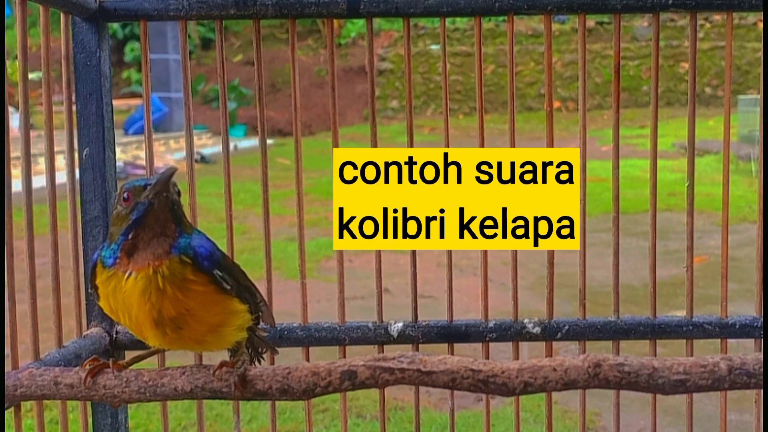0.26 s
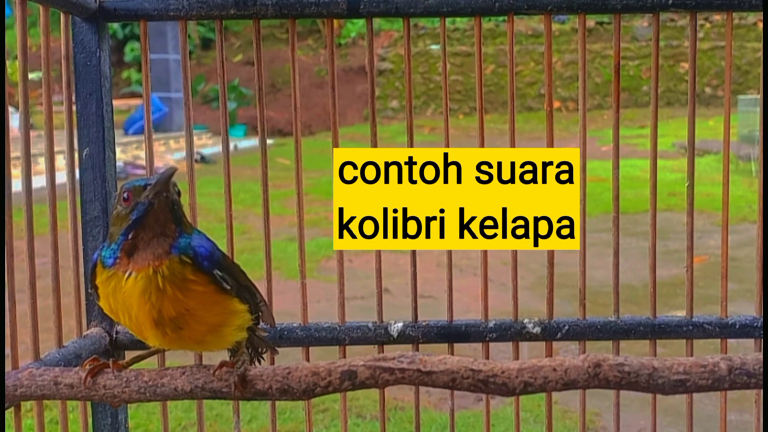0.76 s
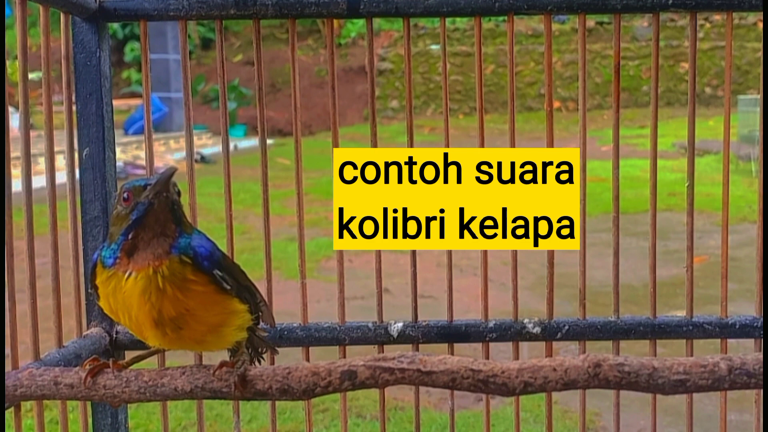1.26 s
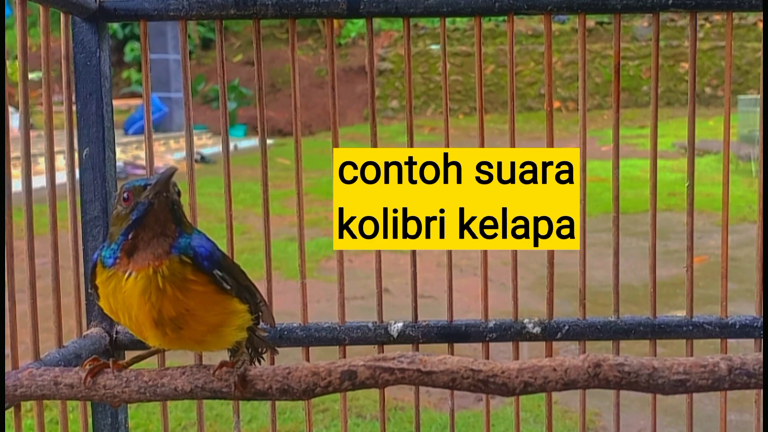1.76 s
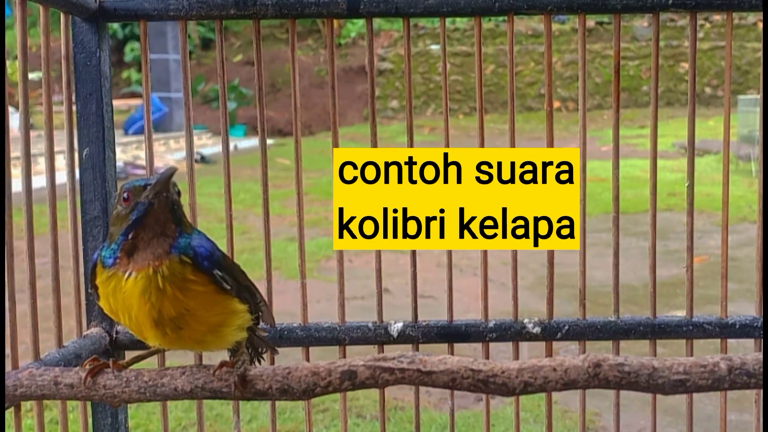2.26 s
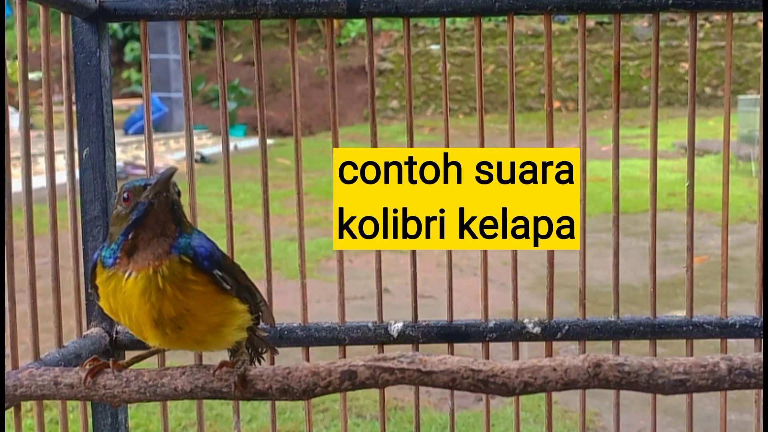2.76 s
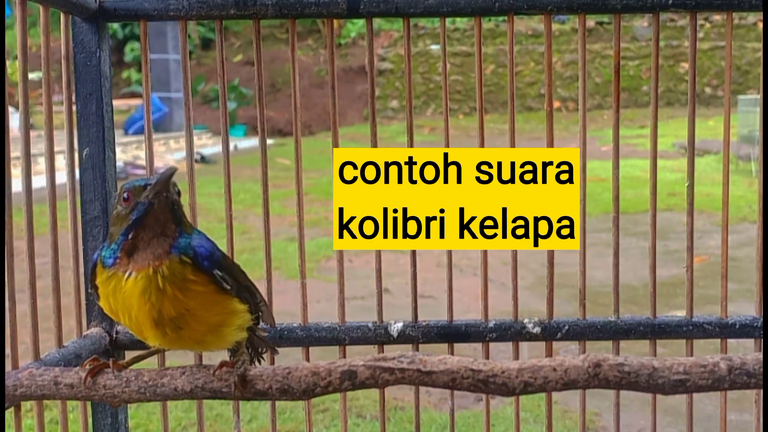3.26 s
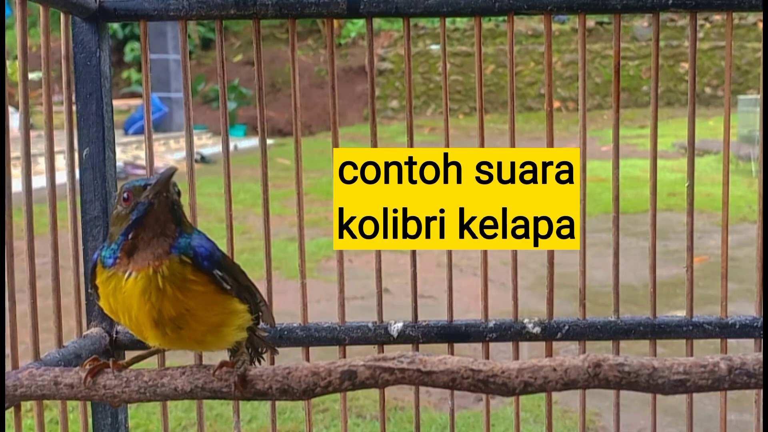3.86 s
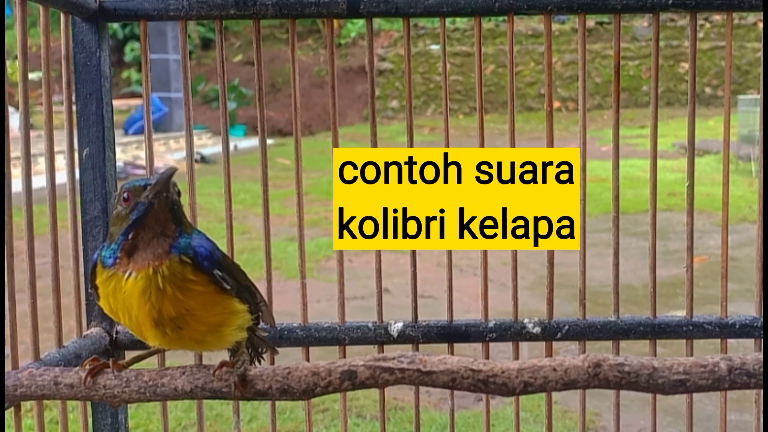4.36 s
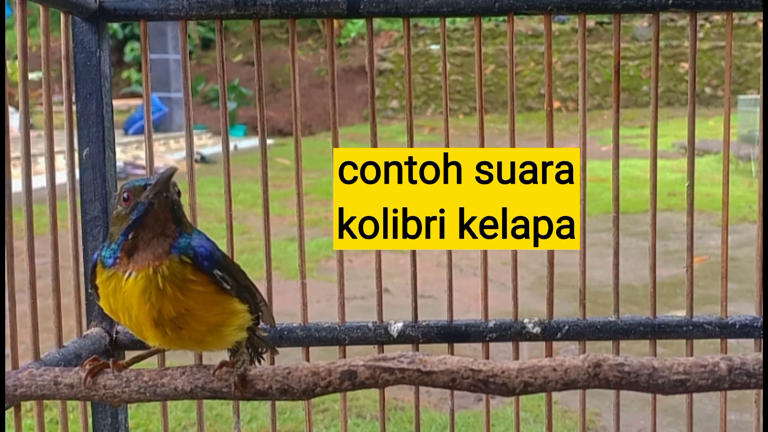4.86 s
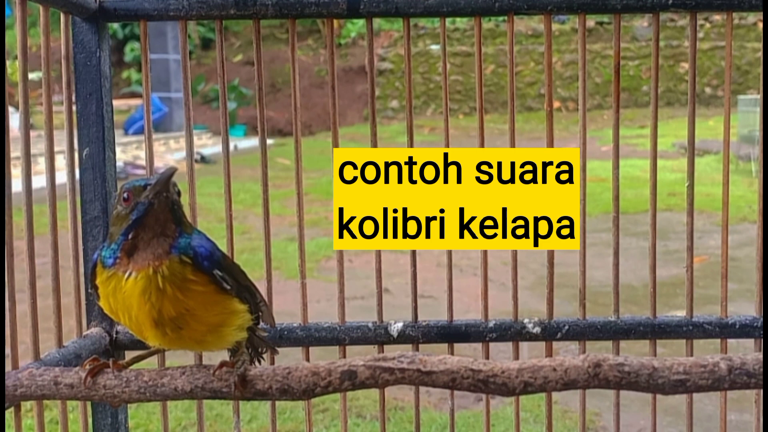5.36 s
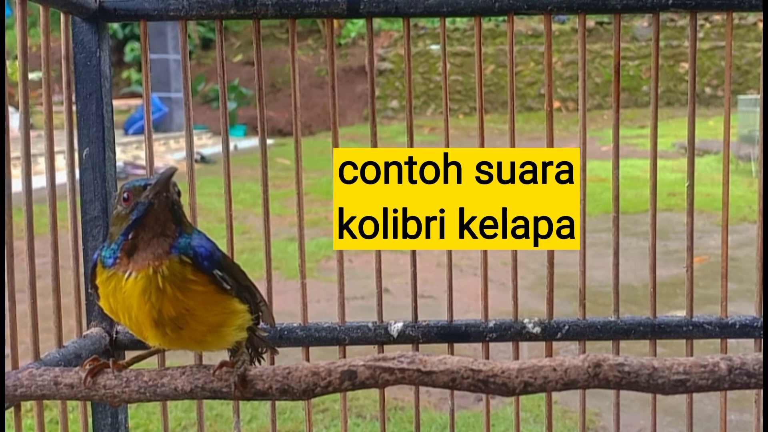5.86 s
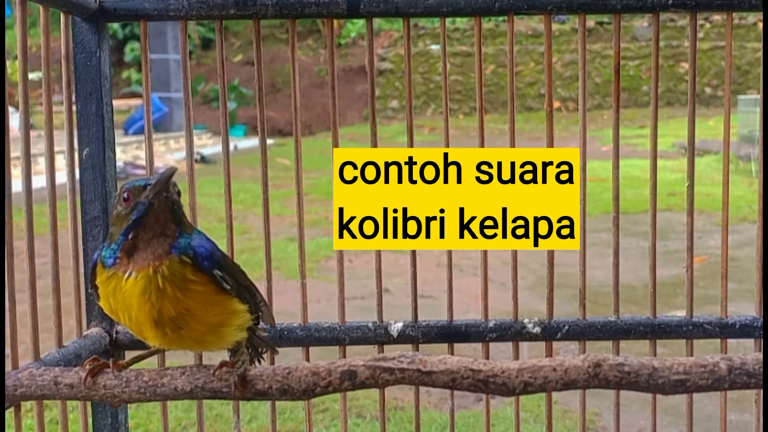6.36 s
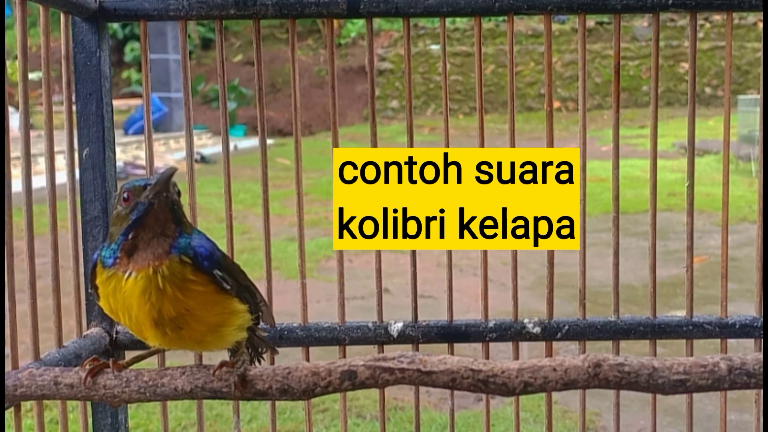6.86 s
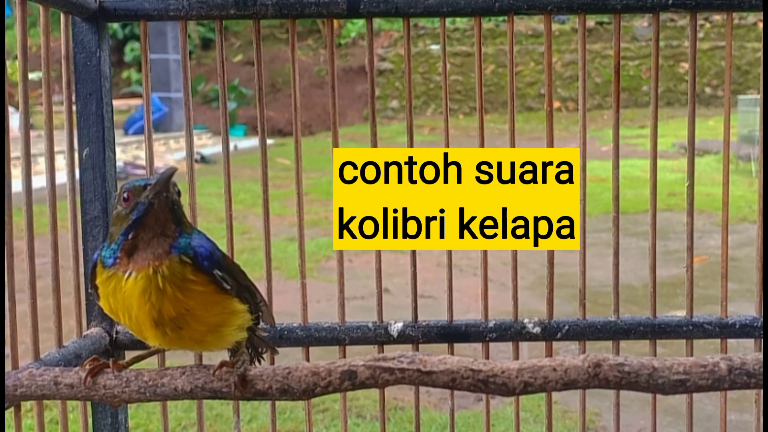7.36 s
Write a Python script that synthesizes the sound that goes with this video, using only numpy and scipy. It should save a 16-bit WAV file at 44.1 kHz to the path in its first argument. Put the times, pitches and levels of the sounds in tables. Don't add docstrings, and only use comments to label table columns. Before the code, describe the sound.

Close-up piercing birdsong: swooping notes, a rapid run of rising chips, buzzy whistles, then sparser chirps, above a constant soft outdoor rumble.

```python
import sys
import numpy as np
from scipy import signal
from scipy.fft import rfft, irfft, next_fast_len
from scipy.io import wavfile
from scipy.ndimage import uniform_filter1d, map_coordinates

SR = 44100
rng = np.random.default_rng(int(sys.argv[2]) if len(sys.argv) > 2 else 0)


def invert_db(level):
    return 10 ** (np.asarray(level, dtype=float) / 20)


def log_audio(samples):
    frames = np.atleast_2d(samples).T
    limited = np.clip(frames, -1, 1)
    pcm = np.round(limited * 32767).astype(np.int16)
    wavfile.write(sys.argv[1], SR, pcm)


N = 336483

# (start [s], air level [dB], climb to the top [s], upper voice level [dB], lower voice level [dB])
CHIPS = [(1.894, -18, 0.051, -22, -24), (2.039, -17.5, 0.054, -22, -22), (2.175, -16.5, 0.051, -22.5, -25),
         (2.303, -16, 0.046, -16.5, -26), (2.416, -17.5, 0.045, -6.5, -14),
         (2.542, -15.5, 0.043, -4.5, -24), (2.662, -16.5, .044, -3.5, -19), (2.786, -18.5, 0.043, -3, -19),
         (2.912, -16, 0.043, -3, -19), (3.067, -17, 0.042, -3.5, -25), (3.56, -16.5, 0.045, -2.5, -16),
         (3.791, -16.5, 0.044, -3.5, -11.5), (3.978, -16.5, 0.049, -3, -11.5),
         (4.193, -19.5, 0.049, -8, -8.5), (4.696, -18.5, 0.045, -8.5, -5), (4.886, -15, .048, -3, -14),
         (5.378, -16, 0.045, -11, -10), (5.564, -15.5, .05, -7, -19), (7.486, -15.5, 0.04, -14, -6.5)]


def in_time(rows):
    s, *columns = np.transpose(rows)
    return [np.interp(np.arange(N) / SR, s, c) for c in columns]


def rms_one(x):
    return x / np.sqrt(np.mean(x ** 2) + 1e-20)


def wobble(hz, size):
    r = np.exp(-2 * np.pi * hz / SR)
    return rms_one(signal.lfilter([1], [1, -2 * r, r * r], rng.standard_normal(size)))


def coloured(spectrum, likeness):
    size = next_fast_len(N)
    log_hz = np.log(np.maximum(np.fft.rfftfreq(size, 1 / SR), 1))
    spectrum_hz, spectrum_db = np.transpose(spectrum)
    likeness_hz, share = np.transpose(likeness)
    gain = invert_db(np.interp(log_hz, np.log(spectrum_hz), spectrum_db, -90, -90))
    alike = np.clip(np.interp(log_hz, np.log(likeness_hz), share), 0, 1)
    mid, side = rfft(rng.standard_normal((2, size)))
    both = np.sqrt(1 + alike) * mid + np.sqrt(1 - alike) * side * [[1], [-1]]
    return rms_one(irfft(gain * both, size)[:, :N])


def yard():
    # (time [s], level [dB])
    yard_level = [
        (0, -43),
        (.48, -40),
        (.52, -43),
        (3, -45),
        (6, -45),
        (7.63, -44.5),
    ]
    # (frequency [Hz], density [dB per Hz])
    yard_spectrum = [(25, -65), (66, -1.5), (92, 2.5), (796, -18.5), (1500, -22), (2480, -20), (3920, -23),
                     (16000, -26.5)]
    # (frequency [Hz], likeness [0 to 1])
    yard_likeness = [(30, 0.22), (90, 1), (300, 0.56), (640, 0.49), (1400, 0.018), (15000, .02)]
    noise = coloured(yard_spectrum, yard_likeness)
    rumble = signal.sosfilt(signal.butter(2, 600, fs=SR, output="sos"), noise)
    swell = invert_db(3 * wobble(5, N))
    return invert_db(in_time(yard_level)[0]) * (noise + (swell - 1) * rumble)


def engine():
    # (time [s], rate [firings per s], level [dB])
    firing = [
        (0, 24.46, -39),
        (.2, 24.63, -36.5),
        (.46, 24.2, -37),
        (.52, 24.77, -45),
        (.7, 25, -85),
    ]
    # (frequency [Hz], width [Hz], level [dB])
    pipe_modes = [(135, 18, 2), (279.5, 18, 2.5), (423.4, 10, -6.5), (562, 18, -13.5), (700, 22, -13),
                  (854, 18, -15)]
    rate, db = in_time(firing)
    turns = np.cumsum(rate) / SR
    fires = np.diff(np.floor(turns), prepend=0) > 0
    puffs = fires * invert_db(1.5 * rng.standard_normal(N))
    puffs = puffs + .03 * rng.standard_normal(N) * np.exp(-(turns % 1))
    out = 0
    for k, (hz, width, mode_db) in enumerate(pipe_modes):
        r = np.exp(-np.pi * width / SR)
        poles = [1, -2 * r * np.cos(2 * np.pi * hz / SR), r * r]
        out = out + (-1) ** k * invert_db(mode_db) * signal.lfilter([1, 0, -1], poles, puffs)
    return invert_db(db) * rms_one(out)


def add_glide(out, rows, lines, flutter, size=130):
    s, hz = np.transpose(rows)[:2]
    first, last = int(s[0] * SR) - 60, min(int(s[-1] * SR) + 60, N)
    t = np.arange(first, last) / SR

    def along(values):
        return uniform_filter1d(np.interp(t, s, values), size=size, mode="nearest")

    pitch_shake, level_shake = flutter[:, first:last]
    pitch = along(hz)
    phase = 2 * np.pi * np.cumsum(pitch * (1 + pitch_shake)) / SR + first
    edge = np.clip(np.minimum(t - t[0], t[-1] - t) / .003, 0, 1)
    for multiple, db in lines:
        swell = along(invert_db(db / 2)) ** 2 * (pitch * multiple < .36 * SR)
        out[first:last] += edge * swell * invert_db(level_shake) * np.sin(multiple * phase)


def squeak(out, s, length, db, draw, flutter):
    when, where, climb = draw
    at, hz = s + .6 * length * when, 3700 + 2200 * where
    rows = [(at, hz), (at + .006, hz + 300 + 500 * climb), (at + .013, hz + 800 + 1300 * climb)]
    squeak_db = db + 4 - np.array([8, 0, 10])
    add_glide(out, rows, [(1, squeak_db), (2, squeak_db - 11)], flutter)


def without_band(x, hz):
    return signal.sosfiltfilt(signal.butter(2, hz, "bandstop", fs=SR, output="sos"), x)


def rasp(voice):
    # (start [s], length [s], level [dB])
    note_air = [(0.608, 0.057, -19), (0.74, 0.047, -13.5), (.963, 0.045, -12.5), (1.181, 0.05, -13.5),
                (1.618, 0.049, -22.5), (1.766, 0.05, -20.5), (3.245, 0.091, -18.5), (3.405, 0.024, -28),
                (4.384, 0.061, -18), (5.056, 0.065, -14), (5.216, 0.032, -16.5), (5.837, 0.051, -24),
                (6.146, .044, -27), (6.633, 0.049, -19.5), (6.958, 0.057, -19), (7.138, 0.061, -18.5),
                (7.302, .054, -24)]
    # (start [s], length [s], level [dB])
    rustles = [
        (5.491, 0.071, -43),
        (5.772, 0.052, -41.5),
        (6.501, .077, -51),
        (6.855, 0.016, -32.5),
        (6.92, 0.023, -38),
    ]
    # (frequency [Hz], density [dB per Hz])
    mids_spectrum = [(900, -30.5), (2600, -17.5), (3600, -8), (4500, -1.5), (6000, 1), (7500, -7.5),
                     (9000, -10.5), (11000, -8.5)]
    treble_spectrum = [(7400, -19), (8700, -12), (10000, -8), (10700, 8.5), (11500, -5.5), (13500, -6),
                       (15200, -5), (16500, -7)]
    hoarse_from_s, hoarse_until_s = 1.85, 5.7
    gap_leak = .12
    t = np.arange(N) / SR
    mids, treble, squeaks = np.zeros(N), np.zeros(N), np.zeros(N)
    # (start, length, dB, time by which bright air outlasts the rest); chip air outlasts the climb
    bursts = [(s, climb + .007, db, .0058) for s, db, climb, *_ in CHIPS]
    bursts += [(*row, -.004) for row in note_air + rustles]
    chance = rng.random((len(bursts), 4, 3))
    shaky = np.array([.012 * wobble(500, N), 2 * wobble(400, N)])
    for (s, length, db, lingers), draws in zip(bursts, chance):
        near = slice(max(int((s - .03) * SR), 0), int((s + length + .12) * SR))
        rise = np.maximum(s + .0047 - t[near], 0)
        fall = np.maximum(t[near] - s - length + .018, 0)
        late = np.maximum(t[near] - s - length - lingers, 0)
        mids[near] += invert_db(db - 2280 * rise - 1150 * fall)
        thin_db = -7.5 - .41 * (db + 35.5)
        treble[near] += invert_db(db - 2000 * rise - 1600 * late) * invert_db(thin_db)
        if lingers > 0 and s < hoarse_until_s:
            for draw in draws:
                squeak(squeaks, s, length, db, draw, shaky)
    breath = invert_db(-30) * np.sqrt(uniform_filter1d(voice ** 2, size=400) + 1e-12)
    grain = invert_db(1.2 * wobble(500, N))
    partly = [(100, .82), (20000, .12)]   # (frequency [Hz], left-right likeness)
    hiss = (invert_db(.5) * mids + breath) * coloured(mids_spectrum, partly)
    hiss = hiss + (invert_db(9) * treble + breath) * coloured(treble_spectrum, partly)
    hiss = without_band(hiss, (10200, 11300))
    clear = gap_leak * hiss + (1 - gap_leak) * without_band(hiss, (2500, 4000))
    hiss = np.where((t > hoarse_from_s) & (t < hoarse_until_s), hiss, clear)
    fuzz = invert_db(-18) * voice * wobble(855, N)
    return grain * hiss + squeaks + fuzz


def arches(out, flutter, notes, rise, start, edge_db, drop, loss_db, octave_db):
    for s, hz, db, fall, end_hz in notes:
        rows = [(s - rise, start * hz), (s - .4 * rise, (.23 * start + .75) * hz), (s, hz),
                (s + fall / 2, hz + drop * (end_hz - hz)), (s + fall, end_hz)]
        octave = octave_db - 1.3 * (db + 8)
        db = db - np.array([edge_db, 3, 0, loss_db, edge_db])
        add_glide(out, rows, [(1, db), (2, db + octave), (3, db + octave - 22)], flutter)


def bent_strokes(out, flutter, strokes, when, share):
    for s, length, start_hz, end_hz, db in strokes:
        bend_hz = start_hz + share * (end_hz - start_hz)
        rows = [(s, start_hz), (s + when * length, bend_hz), (s + length, end_hz)]
        add_glide(out, rows, [(1, db - np.array([12, 0, 11]))], flutter)


def swoops(out, flutter):
    # (start [s], crest pitch [Hz], crest level [dB], dip pitch [Hz], swell level [dB])
    swoop_notes = [
        (0.768, 5074, -5.5, 4050, -4.5),
        (.995, 4380, -11, 3960, -3.5),
        (1.208, 4830, -5.5, 4128, -6),
    ]
    times_s = np.array([0, .018, .05, .072, .095, .104])
    octave_db = np.array([13, -9.5, -2.5, -17.5, -39, -21])
    end_hz = 4584
    for s, crest_hz, crest_db, dip_hz, swell_db in swoop_notes:
        hz = [.73 * crest_hz, crest_hz, dip_hz, (dip_hz + end_hz) / 2, end_hz, end_hz]
        db = np.array([crest_db - 42.5, crest_db, -13.5, swell_db, swell_db + 3, swell_db - 23])
        lines = [(1, db), (2, db + octave_db), (3, db + octave_db - 8)]
        add_glide(out, np.transpose([s + times_s, hz]), lines, flutter, size=400)


def chips(out, flutter):
    upper_s, upper_hz, upper_loss_db = (.021, .008, .012, .013), (4046, 6200, 6624, 6390), (12, 4.7, 3.2, 28)
    lower_s, lower_hz, lower_loss_db = (.017, .006, .0047, .0054), (3995, 5590, 5750, 5680), (10, 2.2, 3.5, 20)
    false_s, false_hz, false_loss_db = (.031, .028, .003, .004), (4260, 5040, 5620, 5700), (1, .5, 9, 11)
    for s, air_db, climb, upper_db, lower_db in CHIPS:
        strokes = [(upper_db, 0, upper_s, upper_hz, upper_loss_db),
                   (lower_db, 0, lower_s, lower_hz, lower_loss_db),
                   (air_db, .022, false_s, false_hz, false_loss_db)]
        for peak_db, early, times, pitches, losses in strokes:
            start, bend, hold, end = times
            low, knee, top, sag = pitches
            first, middle, held, last = losses
            hz = np.array([low, knee, top, top, sag])
            db = peak_db - np.array([first, middle, 0, held, last])
            offsets = np.array([-start, -bend, -early, hold - early, hold + end - early])
            octave_db = db - 11 - (hz - 4000) * .0067
            add_glide(out, np.transpose([s + climb + offsets, hz]), [(1, db), (2, octave_db)], flutter)


def doubled_whistles(out, flutter):
    # (time [s], pitch [Hz], peak level [dB])
    doubled = [
        [(3.252, 4480, -26), (3.265, 5190, -7.5), (3.288, 5270, -17), (3.308, 4350, -11.5), (3.33, 4075, -15.5),
         (3.36, 4433, -4.5), (3.39, 4482, -7.5), (3.425, 4230, -6), (3.436, 4070, -32)],
        [(4.389, 4020, -7.5), (4.4, 4375, -12.5), (4.44, 3570, -19), (4.47, 3830, -5.5), (4.49, 4320, -8),
         (4.52, 4486, -3.5), (4.565, 4117, -10), (4.578, 4080, -39)],
        [(5.068, 4200, -20), (5.103, 3750, -30), (5.13, 3686, -17.5), (5.155, 4113, -4), (5.185, 4396, -2),
         (5.218, 4448, -5), (5.232, 4250, -9.5), (5.252, 4160, -27)],
    ]
    # (multiple of pitch [ratio], level re pitch [dB])
    doubled_lines = [(.5, -21), (1, 0), (1.5, -18), (2, -25), (2.5, -27), (3, -28), (3.5, -34)]
    weak_gains_db = (6, 0, 16, 9, 5, 3, 0)
    for rows in doubled:
        s, hz, db = np.transpose(rows)
        weak = (db < -11.5) & (s < s[-2])
        lines = [(multiple, db + line_db + weak * gain_db)
                 for (multiple, line_db), gain_db in zip(doubled_lines, weak_gains_db)]
        add_glide(out, rows, lines, flutter, size=400)


def glides():
    # (time of the top [s], top pitch [Hz], peak level [dB], fall [s], end pitch [Hz])
    arch_notes = [
        (1.624, 5750, -6.5, 0.017, 3300),
        (6.638, 6180, -4, 0.015, 4780),
        (6.974, 5790, -2.5, .012, 4730),
        (7.147, 5840, -2.5, 0.0136, 4280),
        (7.311, 5720, -3.5, 0.015, 3680),
    ]
    slide_notes = [
        (.621, 4390, -12, .012, 3640),
        (1.768, 4370, -13, .045, 3400),
        (5.856, 5350, -6, .034, 3950),
        (6.161, 5730, -11, .046, 4150),
    ]
    # (start [s], length [s], start pitch [Hz], end pitch [Hz], peak level [dB])
    flicks = [
        (1.634, .016, 8200, 5300, -11),
        (6.651, .014, 8200, 5400, -19),
        (6.986, .018, 7800, 5400, -10),
        (7.157, .019, 8400, 5200, -10),
        (7.323, .027, 8200, 5000, -9),
        (4.199, .032, 5600, 10000, -15),
        (.63, .03, 7600, 6100, -12),
        (5.066, .03, 4950, 4400, -12),
        (5.081, .046, 5600, 5560, -15),
        (3.31, .04, 5300, 5290, -21),
    ]
    hooks = [
        (.964, .037, 5200, 6900, -8),
        (1.186, .024, 5400, 7000, -9),
        (7.481, .03, 6400, 8540, -8),
        (1.893, .03, 5300, 6900, -13),
        (.745, .028, 5900, 7400, -12),
    ]
    out = np.zeros(N)
    hoarse = np.array([.009 * wobble(600, N), 1.5 * wobble(400, N)])
    clear = np.array([.003 * wobble(300, N), .8 * wobble(150, N)])
    arches(out, clear, slide_notes, rise=.011, start=.93, edge_db=17, drop=.85, loss_db=2, octave_db=-3.5)
    bent_strokes(out, clear, flicks, when=.32, share=.49)
    bent_strokes(out, clear, hooks, when=.75, share=.258)
    swoops(out, clear)
    arches(out, clear, arch_notes, rise=.01, start=.72, edge_db=27, drop=.3, loss_db=6, octave_db=-18)
    chips(out, hoarse)
    doubled_whistles(out, clear)
    return out


def at_microphones(x):
    # (time [s], left lag [samples], left-right level [dB])
    head_turns = [
        (.6, 6.37, 0),
        (1.8, 6.96, 0.5),
        (2.5, 8.06, -1),
        (3.5, 8.5, 0.5),
        (4.2, 7.65, -2),
        (4.6, 6.2, 0),
        (5.3, 2.3, 1),
        (6.1, 0.98, -3.5),
        (6.8, 7.3, -1.5),
        (7.6, 6.3, -0.5),
    ]
    lag, pan_db = in_time(head_turns)
    left = map_coordinates(x[0], [np.arange(N) - lag], order=3, mode="nearest")
    return np.array([left * invert_db(pan_db / 2), x[1] * invert_db(-pan_db / 2)])


def yard_echo(x, t60):
    t = np.arange(int(.6 * SR)) / SR
    tail = rng.standard_normal((2, len(t))) * invert_db(-60 * t / t60) * (t > .004)
    return signal.fftconvolve(x[None], tail / np.sqrt(np.sum(tail ** 2) / 2), axes=1)[:, :N]


def far_bird():
    # (start [s], length [s], start pitch [Hz], highest pitch [Hz], peak level [dB])
    far_slurs = [
        (1.3, 0.18, 1815, 1900, -54),
        (1.469, 0.23, 2255, 2636, -45.5),
        (1.761, 0.32, 2244, 2770, -43.5),
        (5.437, .13, 2710, 2740, -46),
        (6.187, 0.18, 2190, 2790, -49.5),
        (6.519, 0.091, 2265, 2530, -49),
        (7.393, 0.29, 1996, 1980, -50),
    ]
    out = np.zeros(N)
    for s, length, start_hz, top_hz, db in far_slurs:
        end_hz = top_hz * (1 - .9 * .5 * length)
        rows = [(s, start_hz), (s + .5 * length, top_hz), (s + length, end_hz)]
        blur = np.array([.035 * wobble(120, N), 5 * wobble(25, N)])
        add_glide(out, rows, [(1, db - np.array([0, 0, 7]))], blur, size=900)
    return .3 * out + yard_echo(out, t60=.3)


def knock():
    start_s, hz, db, t60_s = 6.93, 190, -33, .25
    t = np.maximum(np.arange(N) / SR - start_s, 0)
    return invert_db(db - 60 * t / t60_s) * (1 - np.exp(-t / .008)) * np.sin(2 * np.pi * hz * t)


def scene():
    voice = glides()
    air = rasp(voice)
    bird = at_microphones(voice + air) + invert_db(-20.5) * yard_echo(voice + air[0], t60=.29)
    return bird + far_bird() + engine() + knock() + yard()


def masked_bands(x):
    hz, _, z = signal.stft(x, SR, nperseg=2048, noverlap=1536)
    edges = np.geomspace(1300, 16300, 33)
    band = np.digitize(hz, edges)
    power = np.mean(np.abs(z) ** 2, axis=0)
    db = 10 * np.log10([power[band == k].mean(axis=0) + 1e-14 for k in range(1, 33)])
    peak_db = 10 * np.log10([power[band == k].max(axis=0) + 1e-14 for k in range(1, 33)])
    db = np.maximum(db, np.roll(db, 2, axis=1) - 16)
    octaves = np.abs(np.log2(edges[1:, None] / edges[None, 1:]))
    mask = np.max(db[None] - 10.5 * octaves[:, :, None], axis=1) - 30
    luck = rms_one(uniform_filter1d(rng.standard_normal(db.shape), size=7))
    noisy = peak_db - db < 8.5
    stray = invert_db(3 * luck[::-1] * noisy)
    masked = peak_db - 7 < mask + 5 * luck
    stray_hole = luck > np.quantile(luck, 1 - .032)
    gone = masked | stray_hole
    untouched = np.ones((1, db.shape[1]))
    keep = np.vstack([untouched, (1 - gone) * stray, untouched])
    return signal.istft(z * keep[band], SR, nperseg=2048, noverlap=1536)[1][:, :N]


def roll_off(x):
    return signal.sosfilt(signal.butter(12, 16330, fs=SR, output="sos"), x)


def record(dry):
    ceiling = .88
    lean = masked_bands(dry)
    rounded = ceiling * lean / (ceiling ** 6 + lean ** 6) ** (1 / 6)
    cut = signal.sosfilt(signal.cheby2(12, 70, 16300, fs=SR, output="sos"), rounded)
    return roll_off(cut)


dry = scene()
out = record(dry)
log_audio(out)
```